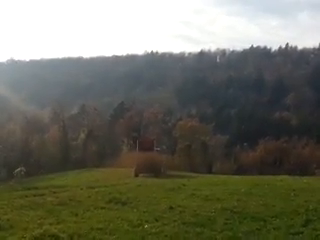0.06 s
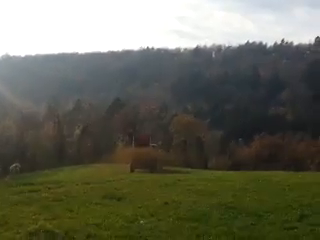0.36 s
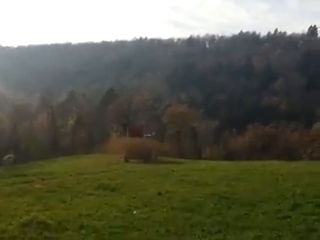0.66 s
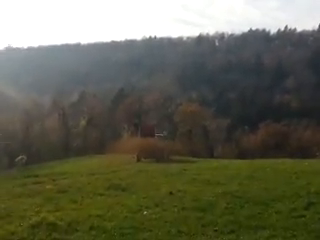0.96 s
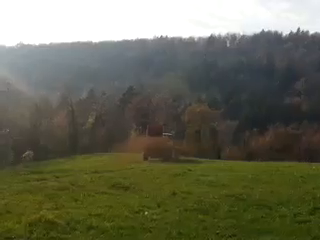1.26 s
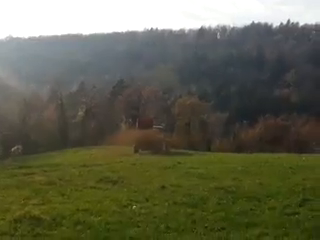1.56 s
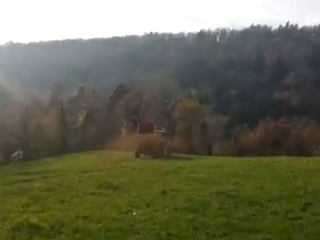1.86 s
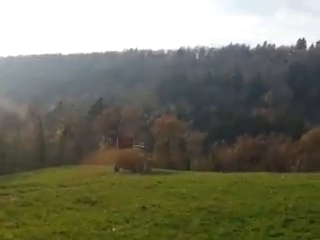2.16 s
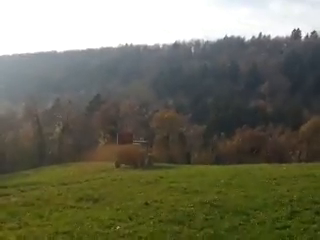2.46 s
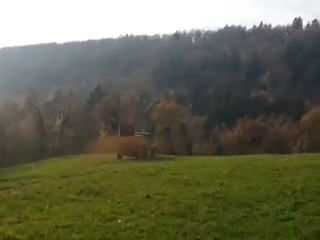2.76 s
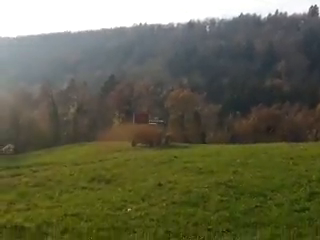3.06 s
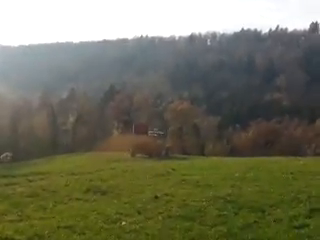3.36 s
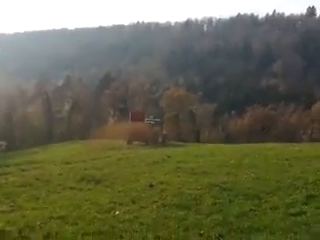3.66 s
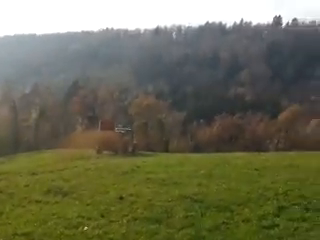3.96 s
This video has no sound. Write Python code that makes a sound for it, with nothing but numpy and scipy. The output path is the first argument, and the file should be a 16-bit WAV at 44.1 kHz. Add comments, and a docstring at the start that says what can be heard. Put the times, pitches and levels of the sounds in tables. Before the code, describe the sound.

Far from a hand-held stereo microphone in a meadow, a manure spreader rasps and surges behind a humming tractor. A few lumps clank and thud, then the sound turns duller and runs on, lightly echoed by trees.

```python
"""A tractor pulls a manure spreader across a meadow, far from a hand-held stereo microphone.
From the start the beaters shred the load in a fast pulsing rasp that surges at each clump; the rotor's
drone throbs once a turn, its drive whines, the diesel hums and the trees echo it all.
From 0.4 s to 2.3 s clods knock on the body and hard lumps clank on the blades.
Then the engine softens, and the rasp, now duller, runs on with a few more clumps."""
import sys
import numpy as np
from scipy import signal
from scipy.fft import rfft, irfft
from scipy.io import wavfile

SR = 44100
rng = np.random.default_rng(int(sys.argv[2]) if len(sys.argv) > 2 else 0)


def file_out(sig):
    """Save sig as 16-bit WAV at sys.argv[1]."""
    # one column per channel
    cols = np.atleast_2d(sig).T
    # limit, then scale
    lim = np.clip(cols, -1, 1)
    pcm = np.round(lim * 32767).astype(np.int16)
    wavfile.write(sys.argv[1], SR, pcm)


N = 176400

ROTOR_HZ, ROTOR_PEAK_S, BLADES = 8.315, 0.128, 6
BLADE_DEPTH, THROB_DEPTH = 0.11, 0.64
TICKS_PER_S, TICK_SPREAD_DB, HISS_DB = 4200, 1.5, 1
# Steady feed to the beaters. Each row: time in seconds, level in dB, treble gain in dB.
FEED = [(0, -25, 1.5), (.9, -24.5, 1.5), (1.3, -24, 2), (1.85, -25, 0), (2.3, -22.5, -4), (2.6, -23, -5),
        (3.05, -23, -5), (3.35, -23.5, -3), (4, -22, -4.5)]
TREBLE_HZ = 2740
# Shredding spectrum. Each row: frequency in Hz, gain in dB.
SHRED_SPECTRUM = [(500, -8), (900, -12), (1350, -3), (2000, -0.5), (2550, -5.5), (2920, -9), (3300, -2),
                  (3900, -0.5), (4700, -1.5), (5700, -12.5), (6600, -14.5), (7600, -16), (9400, -21),
                  (10500, -34.5), (13500, -50.5)]
# Clumps caught. Each row: start in seconds, hold in seconds, level in dB, scrape level in dB.
CLUMPS = [(0.028, 0.092, -26, -32.5), (0.252, 0.041, -26.5, -47), (.374, 0.16, -23.5, -34),
          (0.602, 0.14, -26, -32), (1.018, .045, -26, -29.5), (1.164, 0.075, -26, -30),
          (1.349, 0.036, -27, -32), (1.498, 0.049, -24, -44), (1.638, 0.14, -23, -34),
          (1.927, 0.1, -25, -28), (2.166, 0.067, -23, -36), (3.157, 0.05, -25.5, -25),
          (3.618, 0.058, -22, -23), (3.855, 0.034, -23, -36), (3.93, 0.045, -28, -49)]
CLUMP_ATTACK_S, CLUMP_DECAY_S = 0.009, 0.068
SCRAPE_HZ, SCRAPE_WIDTH_HZ = 4140, 1230
# Clump colour on top of the shredding spectrum. Each row: frequency in Hz, gain in dB.
CLUMP_EQ = [(500, 3), (1400, 2.5), (2500, 1.5), (4000, 0), (9000, 4)]
# Narrow cut or boost in the rasp. Each row: time in seconds, gain in dB.
RASP_BAND_GAIN = [(0, -1.5), (1.8, -3), (2.45, -6), (2.9, -1), (3.4, 4.5), (4, 3.5)]
RASP_BAND_HZ, RASP_BAND_WIDTH_HZ = 2940, 260
# Low and high housing resonances. Each row: time in seconds, frequency in Hz, relative level in dB.
LOW_RING = [(0, 2043, -6), (.6, 2062, -8.5), (1.1, 2029, -11), (1.7, 1970, -9.5), (2.35, 2154, -12),
            (4, 1880, -10.5)]
HIGH_RING = [(0, 3875, -7), (1.05, 3650, -29), (1.3, 3560, -14), (2.4, 3600, -20), (3, 3733, -7),
             (4, 3720, -9.5)]
RING_WIDTH_HZ, RATTLE_DB, RATTLE_HZ = 340, 1.4, 25

# Firing strength. Each entry: one cylinder's relative level in dB.
CYLINDERS_DB = [6.5, 3.5, -5, 2.5]
FIRING_HZ, FIRING_SPREAD_DB, ENGINE_DRIFT, ENGINE_DB = 66.37, 2, 0.0038, -43
# Exhaust response. Each row: frequency in Hz, gain in dB.
EXHAUST_SPECTRUM = [(40, -32), (66, -8), (100, -27), (135, -2), (200, -1), (270, -1.5), (450, -8.5),
                    (570, 0.5), (900, -34), (2000, -52)]
# Engine softening. Each row: time in seconds, gain in dB.
ENGINE_FADE = [(2.2, 0), (3, -7.5)]

# Spreader body resonances. Each row: frequency in Hz, width in Hz, relative level in dB.
BODY_MODES = [(278, 24, -2), (296.5, 24, 0)]
# Running gear rumble. Each row: frequency in Hz, gain in dB.
RUMBLE_SPECTRUM = [(25, -42), (55, -21), (90, -14), (130, -3), (200, 4), (300, 3.5), (350, -4), (550, -14),
                   (900, -12.5), (2000, -51)]
# Swell of body ring and rumble. Each row: time in seconds, gain in dB.
SHAKE_GAIN = [(0, 1), (.6, 2.5), (.95, -2.5), (1.25, 2), (1.75, -0.5), (2.1, -0.5), (2.8, -0.5), (4, -0.5)]
# Rotor drone. Each row: time in seconds, frequency in Hz, level in dB.
DRONE = [(0, 269, -40.5), (.45, 269, -35.5), (.72, 267, -36.5), (.88, 270, -40.5), (1.1, 268.4, -42),
         (1.28, 263.5, -35.5), (1.9, 270, -40.5), (2.65, 273, -38.5), (3.3, 281.5, -43.5),
         (3.9, 275.2, -38)]
# Drive whine. Each row: time in seconds, frequency in Hz, level in dB re WHINE_DB.
WHINE = [(0, 351.7, -0.5), (.9, 356, -6), (1.55, 358, 5), (1.9, 359, -0.5), (2.2, 360, 4), (2.8, 363.4, -5),
         (4, 358, -14)]
BODY_DB, RUMBLE_DB, WHINE_DB, BREEZE_DB = -41, -38, -44.5, -56
# Air on a microphone port. Each row: frequency in Hz, gain in dB.
BREEZE_SPECTRUM = [(15, -6), (35, -6), (70, 0), (130, 16), (300, -18), (1000, -40)]
# Scatter from the trees. Each row: frequency in Hz, level in dB re direct sound.
ECHO_SPECTRUM = [(300, -20.5), (800, -4.5), (2000, -13), (4500, -8.5), (7000, -3), (11000, -3)]
ECHO_T60_S, ECHO_FADE_HZ = 0.51, 5

# Clods on the body. Each row: start in seconds, level in dB.
KNOCKS = [(.445, -29), (1.722, -28), (2.24, -28.5)]
KNOCK_ATTACK_S, KNOCK_DECAY_S = 0.0083, 0.015
# Knock spectrum. Each row: frequency in Hz, gain in dB.
KNOCK_SPECTRUM = [(300, -1), (420, 0), (750, -11), (1200, -22), (3000, -50)]
# Lumps on the blades. Each row: start in seconds, smack in dB, low clank in dB, high clank in dB.
LUMPS = [(0.621, -19, -16, -15), (.692, -22, -37, -18), (1.176, -24, -40, -19), (1.357, -20, -22, -27),
         (1.644, -21, -25, -26), (1.71, -19, -19, -21)]
LUMP_ATTACK_S, SMACK_DECAY_S, CLANK_DECAY_S = 0.002, 0.015, 0.012
CLANK_HZ, CLANK_WIDTH_HZ = (1950, 3530), (300, 270)

# Microphone port responses. Each row: frequency in Hz, left gain in dB, right gain in dB.
PORT_EQ = [(500, -2, 1), (1300, -3, 2), (2000, -3, 0), (2350, -4, 5), (2950, 0, -3), (3500, 2, -3),
           (4100, -1, 1), (4850, -8, 4), (5600, 0, -1), (6200, 3, -5), (7500, 0, 1), (8250, -10, 2),
           (8900, 0, 4), (9600, 0, 1), (10150, -3, -18), (10800, 6, 8)]
# Phase between the ports. Each row: frequency in Hz, left lead in radians.
PORT_PHASE = [(0, 0.5), (2410, 0.35), (2840, 0.2), (3190, -1), (4570, -1.45), (5000, 0), (6370, -6.5),
              (7670, -7.5), (8610, -12), (10300, -11), (12900, -21)]
EDGE_FADE_S, LOWPASS_HZ = 0.002, 14000


def undb(db):
    """Decibels to gain."""
    return 10 ** (np.asarray(db) / 20)


def unit(x):
    """Scale to rms 1."""
    return x / np.sqrt(np.mean(x ** 2))


def curve(table, column=1):
    """One column of a time table at every sample."""
    table = np.array(table, float)
    return np.interp(np.arange(N) / SR, table[:, 0], table[:, column])


def bins_hz():
    """Bin frequencies, floored at 1 Hz."""
    return np.maximum(np.arange(N // 2 + 1) * SR / N, 1)


def colour(x, table, column=1):
    """Filter by (Hz, dB) points."""
    table = np.array(table, float)
    gain_db = np.interp(np.log(bins_hz()), np.log(table[:, 0]), table[:, column])
    return irfft(rfft(x) * undb(gain_db), N)


def highpass(x, hz, order=2):
    """Zero-phase high-pass."""
    return irfft(rfft(x) / np.sqrt(1 + (hz / bins_hz()) ** (2 * order)), N)


def band(x, hz, width_hz):
    """One resonance, gain 1 at its centre."""
    return irfft(rfft(x) / (1 + (2 * (bins_hz() - hz) / width_hz) ** 2), N)


def noise():
    """White noise."""
    return rng.standard_normal(N)


def drift(rate_hz):
    """Smooth random drift, rms 1."""
    return unit(irfft(rfft(noise()) * np.exp(-(bins_hz() / rate_hz) ** 2), N))


def cycles(hz):
    """Cycles completed at every sample."""
    return np.cumsum(hz) / SR


def swell(start_s, attack_s, decay_s, hold_s=0):
    """Linear rise, hold, exponential fall."""
    age_s = np.arange(N) / SR - start_s
    return np.clip(age_s / attack_s, 0, 1) * np.exp(-np.maximum(age_s - attack_s - hold_s, 0) / decay_s)


def rotor_rad():
    """Angle of the beater rotor."""
    return 2 * np.pi * ROTOR_HZ * (np.arange(N) / SR - ROTOR_PEAK_S)


def tearing():
    """Dense ticks of torn straw and dung over a fine hiss."""
    hits = rng.random(N) < TICKS_PER_S / SR
    ticks = hits * noise() * undb(TICK_SPREAD_DB * np.clip(noise(), -2, 2))
    return unit(unit(ticks) + undb(HISS_DB) * noise())


def housing_ring(table):
    """A gliding housing resonance, rattled unevenly."""
    in_phase, quadrature = (unit(band(noise(), 0, RING_WIDTH_HZ)) for _ in range(2))
    phase = 2 * np.pi * cycles(curve(table))
    rattle = unit(undb(RATTLE_DB * drift(RATTLE_HZ)))
    return (in_phase * np.cos(phase) + quadrature * np.sin(phase)) * rattle * undb(curve(table, 2))


def beaters():
    """Blades tear the load and rattle the housing; clumps swell the rasp and add a bright scrape."""
    feed = undb(curve(FEED))
    surge = scrape_gain = 0
    for start_s, hold_s, level_db, scrape_db in CLUMPS:
        envelope = swell(start_s, CLUMP_ATTACK_S, CLUMP_DECAY_S, hold_s)
        surge = np.hypot(surge, undb(level_db) * envelope)
        scrape_gain += undb(scrape_db) * envelope
    steady = unit(colour(tearing(), SHRED_SPECTRUM)) * feed
    clumps = unit(colour(colour(tearing(), SHRED_SPECTRUM), CLUMP_EQ)) * surge
    scrape = unit(band(tearing(), SCRAPE_HZ, SCRAPE_WIDTH_HZ)) * scrape_gain
    housing = (housing_ring(LOW_RING) + housing_ring(HIGH_RING)) * np.hypot(feed, surge)
    blade_pulse = 1 + BLADE_DEPTH * np.cos(BLADES * rotor_rad())
    flicker = undb(0.47 * drift(rate_hz=42))
    rasp = highpass((steady + clumps + scrape + housing) * blade_pulse * flicker, hz=315)
    rasp += band(rasp, RASP_BAND_HZ, RASP_BAND_WIDTH_HZ) * (undb(curve(RASP_BAND_GAIN)) - 1)
    return rasp + highpass(rasp, TREBLE_HZ, order=4) * (undb(curve(FEED, 2)) - 1)


def engine():
    """Four uneven diesel cylinders puff through the exhaust."""
    firing_count = cycles(FIRING_HZ * (1 + ENGINE_DRIFT * drift(rate_hz=1.08)))
    firings = np.flatnonzero(np.diff(np.floor(firing_count)))
    spread_db = FIRING_SPREAD_DB * noise()[:len(firings)]
    pulses = np.zeros(N)
    pulses[firings] = undb(np.resize(CYLINDERS_DB, len(firings)) - spread_db)
    exhaust = highpass(colour(pulses, EXHAUST_SPECTRUM), hz=40)
    return unit(exhaust) * undb(ENGINE_DB + curve(ENGINE_FADE))


def machine_tone(table, wander_hz, flutter_db):
    """A wavering sine along (s, Hz, dB) points."""
    wave = np.sin(2 * np.pi * cycles(curve(table) + wander_hz * drift(rate_hz=8.1)))
    return unit(wave * undb(flutter_db * drift(rate_hz=23))) * undb(curve(table, 2))


def spreader():
    """The shaken body rings, the gear rumbles, the drive whines, the rotor throbs once a turn."""
    ring = sum(undb(db) * unit(band(noise(), hz, width_hz)) for hz, width_hz, db in BODY_MODES)
    rumble = unit(colour(noise(), RUMBLE_SPECTRUM)) * undb(RUMBLE_DB + 0.63 * drift(rate_hz=5.6))
    whine = machine_tone(WHINE, wander_hz=1.2, flutter_db=1) * undb(WHINE_DB)
    throb = unit(1 + THROB_DEPTH * np.cos(rotor_rad()))
    drone = machine_tone(DRONE, wander_hz=1.48, flutter_db=1.4) * throb
    return (unit(ring) * undb(BODY_DB) + rumble) * undb(curve(SHAKE_GAIN)) + drone + whine


def breeze():
    """Light air moving over one port."""
    return unit(colour(noise(), BREEZE_SPECTRUM)) * undb(BREEZE_DB)


def tree_echoes(x, paths=4):
    """Short diffuse echoes, fading in and out as the air moves."""
    echoes = 0
    for _ in range(paths):
        tail = noise() * np.exp(-np.log(1000) * np.arange(N) / SR / ECHO_T60_S)
        fading = np.cos(2 * np.pi * (cycles(ECHO_FADE_HZ * drift(rate_hz=0.97)) + rng.random()))
        echoes += fading * irfft(rfft(x) * rfft(tail / np.linalg.norm(tail)), N)
    return colour(echoes * np.sqrt(2 / paths), ECHO_SPECTRUM)


def clods():
    """Heavy clods knock on the body."""
    knocks = sum(undb(db) * swell(start_s, KNOCK_ATTACK_S, KNOCK_DECAY_S) for start_s, db in KNOCKS)
    return unit(highpass(colour(noise(), KNOCK_SPECTRUM), hz=250)) * knocks


def lumps():
    """Hard lumps smack the blades and ring two resonances."""
    smacks = sum(undb(db) * swell(start_s, LUMP_ATTACK_S, SMACK_DECAY_S) for start_s, db, *_ in LUMPS)
    impacts = unit(colour(noise(), SHRED_SPECTRUM)) * smacks
    for mode, (hz, width_hz) in enumerate(zip(CLANK_HZ, CLANK_WIDTH_HZ)):
        blows = sum(undb(clank_db[mode]) * swell(start_s, LUMP_ATTACK_S, CLANK_DECAY_S)
                    for start_s, _, *clank_db in LUMPS)
        impacts += unit(band(noise(), hz, width_hz)) * blows
    return highpass(impacts, hz=400)


def scene():
    """The rig is slightly to the right, so its sound reaches the left port later."""
    rig = beaters() + lumps() + clods() + engine() + spreader()
    lead_rad = np.interp(bins_hz(), *np.array(PORT_PHASE).T)
    left = irfft(rfft(rig) * np.exp(1j * lead_rad), N)
    return np.array([direct + tree_echoes(rig) + breeze() for direct in (left, rig)])


def record(dry):
    """Colour each port, fade the ends, low-pass."""
    heard = np.array([colour(dry[0], PORT_EQ, column=1), colour(dry[1], PORT_EQ, column=2)])
    edge_s = np.minimum(np.arange(N), np.arange(N)[::-1]) / SR
    heard *= np.clip(edge_s / EDGE_FADE_S, 0, 1)
    return signal.sosfilt(signal.ellip(8, 0.2, 70, LOWPASS_HZ, fs=SR, output="sos"), heard)


dry = scene()
out = record(dry)
file_out(out)
```